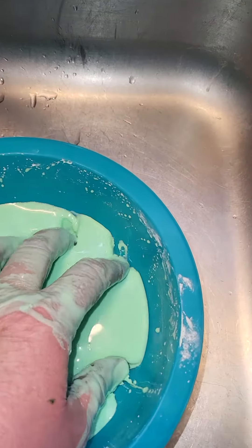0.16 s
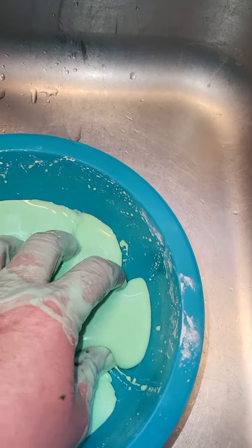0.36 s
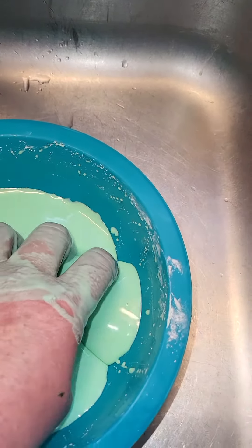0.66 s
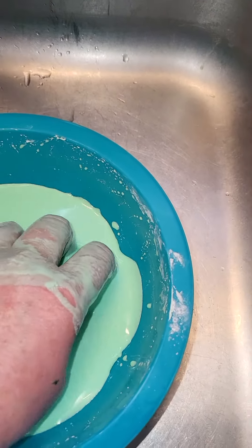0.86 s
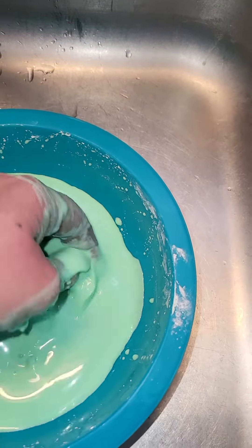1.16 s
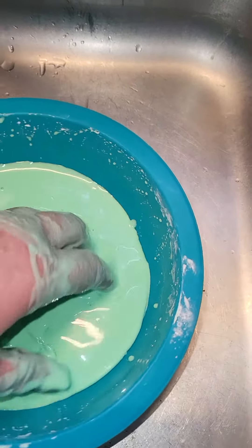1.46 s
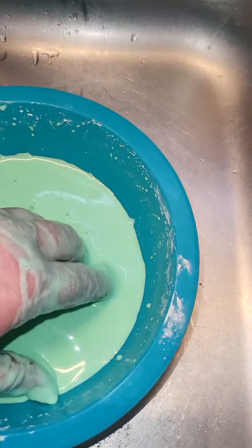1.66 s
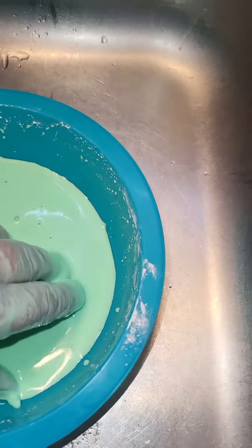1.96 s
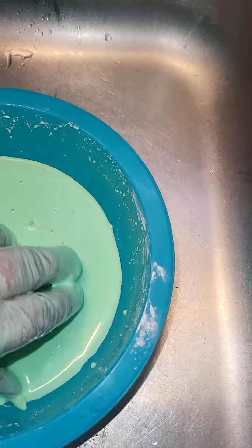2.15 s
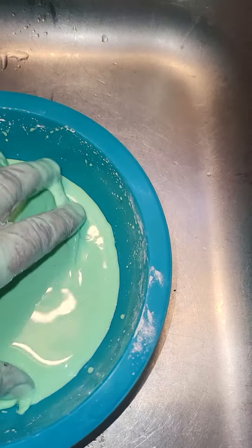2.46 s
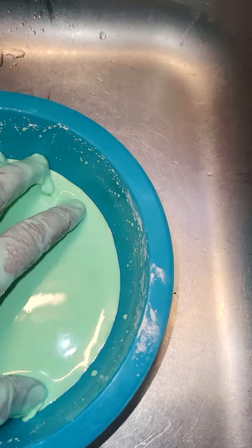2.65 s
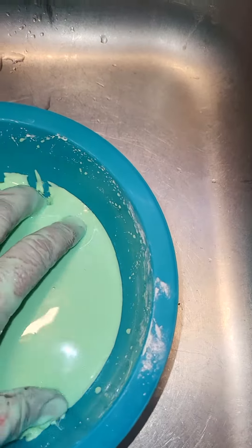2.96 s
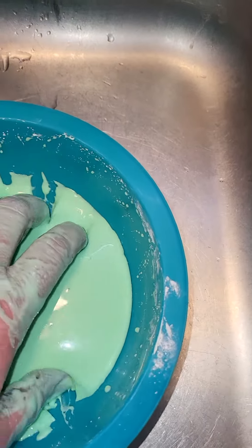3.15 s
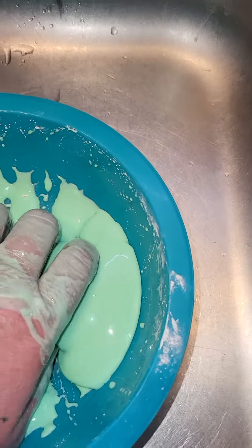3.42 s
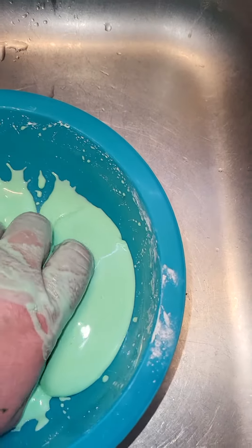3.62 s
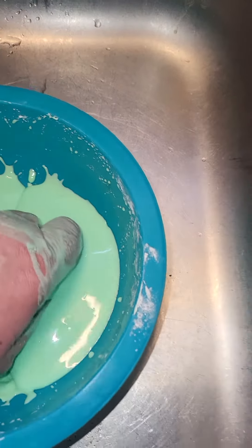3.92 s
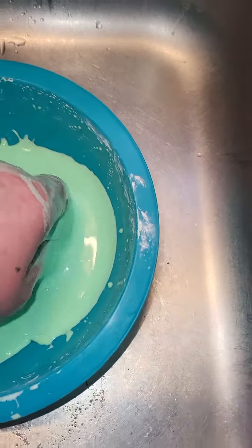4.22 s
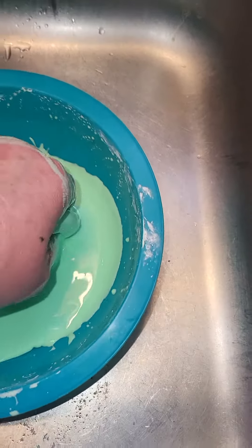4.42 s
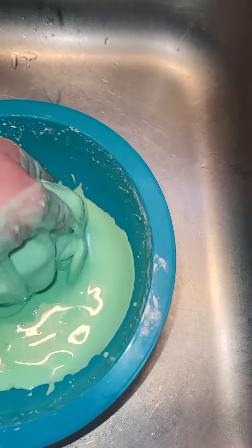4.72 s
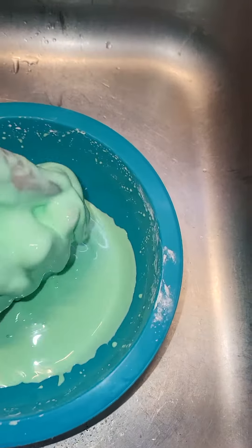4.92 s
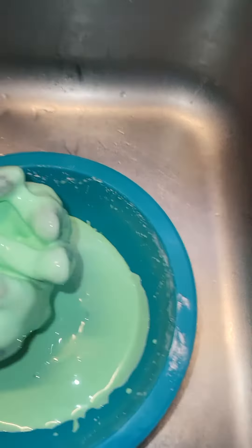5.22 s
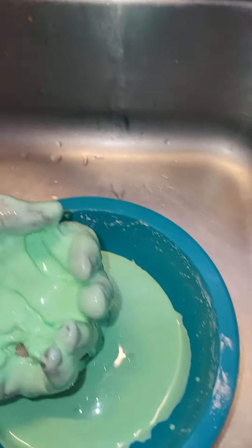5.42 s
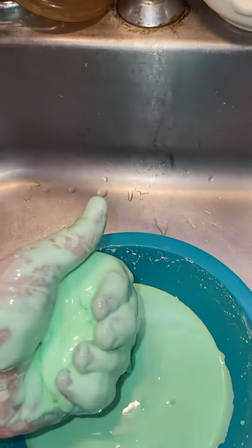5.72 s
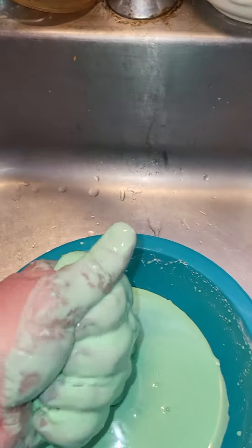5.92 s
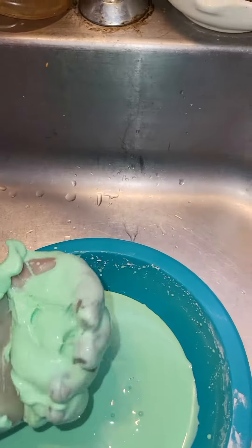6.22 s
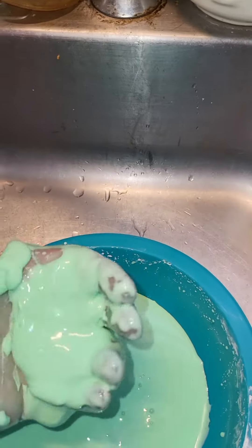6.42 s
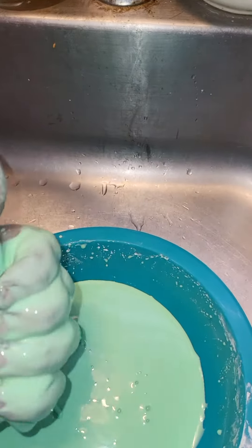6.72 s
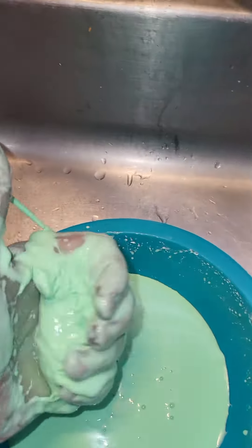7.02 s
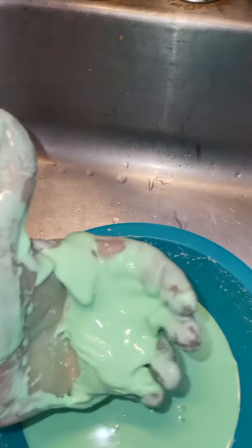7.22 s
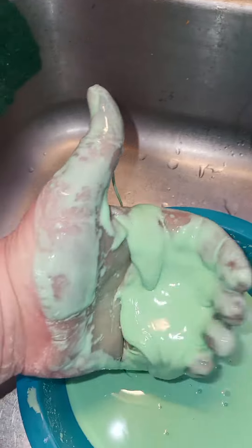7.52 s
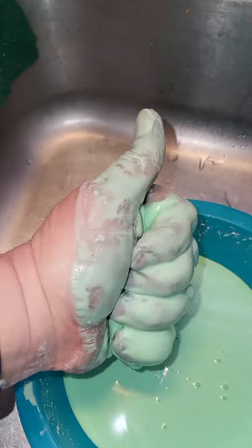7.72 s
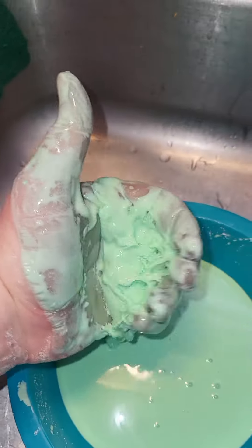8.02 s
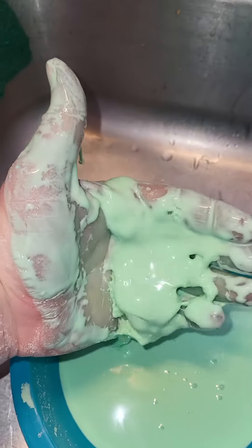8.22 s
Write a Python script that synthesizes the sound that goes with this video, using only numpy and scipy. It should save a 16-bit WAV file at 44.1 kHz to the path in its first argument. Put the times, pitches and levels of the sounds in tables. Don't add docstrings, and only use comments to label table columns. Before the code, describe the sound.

Very close dull thumps, creaks and wet scrapes of a bowl of slurry in a metal sink, a loud bouncing bang, then quiet squishing snaps.

```python
import sys
import numpy as np
from scipy import signal
from scipy.fft import rfft, irfft, next_fast_len
from scipy.io import wavfile
from scipy.ndimage import uniform_filter1d

SR = 44100
rng = np.random.default_rng(int(sys.argv[2]) if len(sys.argv) > 2 else 0)


def invert_db(level):
    return 10 ** (np.asarray(level, dtype=float) / 20)


def persist_wave(psi):
    counts = np.round(np.clip(psi, -1, 1) * 32767).astype(np.int16)
    wavfile.write(sys.argv[1], SR, np.atleast_2d(counts).T)


N = 369116

# (time [s], peak level [dB], upper wall modes [dB], rim [dB])
FOOT_KNOCKS = [
    (0.004, -25, -4, -4),
    (0.017, -36, 12, 7),
    (1.685, -27.5, -13, -27),
    (2.003, -30, -25, -16),
    (2.109, -38, -24, -17),
    (4.162, -25.5, -6.5, -13),
    (4.791, -17.5, -7.5, -20.5),
    (4.944, -22, -5.5, -20),
    (4.98, -17.5, -4, -10),
    (5.008, -25.5, -3, -14),
]
# (time [s], peak level [dB], upper wall modes [dB], rim [dB])
FLANK_KNOCKS = [
    (2.686, -42.5, -4, -12),
    (3.435, -29, -12, -24),
    (3.452, -34, -10, -28),
    (4.007, -38.5, -6, 2),
    (4.866, -8, -3, -10.5),
    (4.916, -18, -4, -41),
    (4.962, -22, -4, -28),
]
# (time [s], peak level [dB], upper wall modes [dB], rim [dB])
SHOULDER_KNOCKS = [
    (3.174, -33, -2, -14),
    (4.122, -12.5, -4, -14),
    (4.145, -20, -5, -30),
    (4.218, -16.5, -5, -16),
]
# (time [s], peak level [dB], upper wall modes [dB], rim [dB])
WALL_KNOCKS = [
    (3.158, -39, -1, -22),
    (3.19, -37, -1, -22),
    (3.209, -32, -1.5, -20),
    (3.228, -38, -1, -22),
    (4.8412, -6, -2, -8),
    (4.8426, -4, -1.5, -8),
    (4.886, -17, -3, -18),
    (4.892, -7, -3, -13),
]
# (time [s], peak level [dB], upper wall modes [dB], rim [dB])
CREAKS = [(0.156, -33, -1, -22), (0.167, -31, -5, -22), (0.191, -34, -20, -30), (0.202, -31, -2, -15),
          (0.24, -31, -4, -14), (0.268, -32, -2, -24), (0.278, -30, -4, -20), (0.343, -31, -3, -25),
          (0.356, -15, -1.5, -17), (0.381, -33, -8, -20), (0.399, -30, -3, -22), (0.445, -34, -6, -18),
          (0.463, -34, -5, -18)]
# (frequency [Hz], width [Hz], level [dB])
BOWL_MODES = [(222.8, 48, 4), (380, 25, 1.5), (490, 67, -2), (575, 50, 2), (680, 92, -2)]
# (frequency [Hz], width [Hz], level [dB])
WALL_MODES = [(930, 150, -1), (1085, 150, 0), (1300, 470, -4), (1500, 400, -4), (1930, 300, -10),
              (2300, 400, -10)]
# (frequency [Hz], width [Hz], level [dB])
RIM_MODES = [(2500, 150, 8.5), (2960, 630, 7), (4130, 500, 11), (5200, 1500, 7), (6300, 340, -12.5),
             (7600, 1600, -18.5)]
# (time [s], peak level [dB], pitch [Hz], upper modes [dB])
PRESSES = [(0.002, -30, 130, -3), (0.018, -28.5, 82, -12), (0.162, -38.5, 86, 5), (0.198, -42, 90, 6),
           (0.236, -40, 90, 5), (0.272, -36, 96, -2), (0.355, -35.5, 111, 3.5), (0.397, -36, 115, -10),
           (0.457, -37.5, 90, -1.5), (0.6, -34.5, 96, -13), (0.853, -35, 94, -7), (1.092, -31.5, 76, -7),
           (1.388, -32.5, 101, -9), (1.412, -26, 132, -11.5), (1.596, -32.5, 105, -26),
           (1.685, -19, 114, -2.5), (2.002, -21, 111, -12), (2.012, -21, 108, -20), (2.111, -22, 90, -18.5),
           (2.122, -22, 86.3, -22), (2.242, -34, 75, -14), (2.506, -32, 93, -20), (2.681, -29, 117, -17),
           (2.745, -38, 80, -15), (2.825, -38, 65, -15), (2.859, -40, 61, -8), (3.434, -31, 90, 3.5),
           (3.862, -36.5, 107, -5.5), (3.988, -28, 100.5, -8.5), (4.044, -26.5, 90, -26),
           (4.392, -34.5, 106, -8), (4.599, -33.5, 100, -22)]
# (time [s], peak level [dB], pitch [Hz], upper modes [dB])
BOUNCES = [(4.125, -15.5, 87.3, -26), (4.147, -21.5, 88, -19), (4.165, -18.5, 81, -7),
           (4.198, -20.5, 84, -9.5), (4.237, -12.5, 101, -24), (4.791, -23.5, 114, -16),
           (4.809, -16, 92, -8.5), (4.843, -7.5, 97, -6.5), (4.867, -7.5, 127.4, -13.5),
           (4.89, -7, 91.6, -16), (4.919, -13, 84, -20), (4.948, -21.5, 60.3, -16.5),
           (4.982, -18.5, 88.8, -19.5), (5.01, -23, 90.3, -14.5)]
# (time [s], peak level [dB], cavity centre [Hz], top octave [dB])
SNAPS = [(0.016, -38, 5240, 0), (1.055, -38.5, 7640, -5.5), (1.0854, -37, 3970, -6),
         (1.0954, -20, 5700, -13), (1.2464, -40.5, 7700, -16), (1.3758, -24.5, 10200, -8),
         (2.235, -43, 10000, -5), (2.7828, -39, 5350, -4), (2.891, -37.5, 5540, -13),
         (3.239, -35.5, 5990, -3.5), (3.829, -37, 5900, -6.5), (3.93, -26, 4970, -3),
         (4.0632, -38.5, 5440, -13), (4.8406, -16, 4500, -17), (4.8661, -23, 4110, -15.5),
         (4.8932, -16, 3940, -25), (5.9668, -40.5, 5400, -7.5), (6.121, -35, 8060, -4.5),
         (6.1509, -29, 7950, -4), (6.1545, -29, 7800, -11), (6.2975, -34, 6970, -5),
         (6.767, -20, 6420, -28), (6.9711, -39.5, 8700, -3), (7.004, -40, 6300, 0),
         (7.078, -25.5, 7000, -10), (7.2258, -43, 11030, -7), (7.6161, -46, 6300, -14),
         (7.7882, -43, 6090, -14.5), (7.94, -31, 7020, -26), (7.9757, -35.5, 5650, -9)]
# (time [s], peak level [dB])
TICKS = [(1.0021, -44), (1.152, -43), (1.6402, -45), (2.4516, -50.5), (3.3495, -41), (3.43, -45),
         (3.778, -46), (3.8563, -41.5), (4.189, -42.5), (4.421, -43.5), (5.198, -54), (5.29, -50),
         (5.3209, -43.5), (6.0602, -48.5), (6.0883, -45.5), (6.1454, -46), (6.157, -33), (6.1847, -50),
         (6.2172, -40), (6.2908, -52), (6.9582, -49), (7.0623, -39.5), (7.1172, -47), (7.1462, -45),
         (7.1675, -37.5), (7.9668, -37), (8.01, -50), (8.0456, -50.5), (8.07, -43.5), (8.172, -47)]
# (time [s], peak level [dB])
SPECKS = [(1.1837, -44), (1.3463, -50), (2.4009, -51), (2.5714, -58), (2.8145, -45), (5.2784, -55),
          (5.309, -55), (6.0944, -51), (6.2934, -45), (7.1024, -47), (7.1906, -47), (7.9548, -46),
          (7.9994, -46), (8.0194, -45), (8.0264, -48), (8.0764, -46)]
# (start [s], hold [s], scrape level [dB], fine fizz level [dB])
STROKES = [(-0.03, .01, -44, -58), (.1, 0.34, -53.5, -65), (.435, 0.0071, -45.5, -60),
           (.55, 0.029, -47, -57.5), (.68, 0.083, -49, -61.5), (.81, 0.073, -46, -57.5),
           (.97, 0.13, -58, -62), (1.15, 0.29, -66.5, -79), (1.365, 0.042, -47, -61),
           (1.49, 0.0056, -47.5, -55), (1.56, 0.034, -60.5, -61), (1.7, 0.4, -71, -77),
           (2.49, .08, -68, -82), (2.63, .02, -62, -74), (2.66, .03, -48.5, -65), (2.76, 0.25, -55, -61.5),
           (3.0, .5, -50, -57.5), (3.56, 0.084, -52.5, -61), (3.7, 0.12, -58.5, -66),
           (3.85, .08, -49.5, -60.5), (4.0, .3, -61.5, -70), (4.65, 0.015, -67, -83.5),
           (5.4, .07, -70, -88), (4.83, .06, -46, -62), (6.04, .08, -67, -65), (6.13, 0.018, -61.5, -55),
           (6.69, .06, -72, -72), (6.79, .1, -63.5, -73), (6.95, .15, -65.5, -60),
           (7.89, .15, -67.5, -59.5)]
# (frequency [Hz], density [dB per Hz])
SCRAPE_COLOUR = [(410, -33), (700, 2), (768, -9), (978, -3.5), (1180, -8.5), (1410, -2), (1820, -6),
                 (2550, -1.5), (3130, -5.5), (5570, -2), (11000, -22), (14300, -49), (22000, -120)]
# (frequency [Hz], density [dB per Hz])
FIZZ_COLOUR = [(5290, -41.5), (9000, -20), (10900, -1.5), (12400, 4.5), (15100, 2), (16000, 5.5),
               (16800, -29.5)]
OOZE_S = [
    1.0,
    2.03,
    3.47,
    3.9,
    5.45,
    6.9,
    7.09,
    8.05,
]
# (level [dB], cavity centre [Hz], length [s])
OOZE = [(-55, 580, 0.31), (-62.5, 2060, 0.1), (-54, 700, 0.06), (-54, 850, 0.14), (-75, 2700, 0.08),
        (-58, 680, 0.13), (-61, 2200, 0.043), (-66, 1700, 0.11)]
# (time [s], sink rumble level [dB])
LOAD = [(0, -46), (1.6, -48.5), (1.9, -58.5), (2.6, -61), (2.72, -52), (2.95, -54), (3.3, -49), (3.8, -51),
        (4.2, -42), (4.7, -58), (5.0, -46), (5.3, -59.5), (5.7, -64.5), (8.37, -64.5)]
# (frequency [Hz], width [Hz], level [dB])
SINK_MODES = [(79, 43, -3), (100, 20, -3), (132, 22, -7)]
# (frequency [Hz], density [dB per Hz])
KITCHEN_COLOUR = [(15, -51), (25, -22), (43, 1.5), (143, -8), (188, 1), (282, -9.5), (315, -15), (657, -21),
                  (817, -51.5), (2780, -47), (3100, -45), (8980, -42.5), (10900, -61), (15100, -37),
                  (16800, -45)]
# (frequency [Hz], width [Hz], level [dB])
DRONES = [(120, 4.9, -11.5), (178.5, 6.8, -11.5), (241, 8.6, -14.5), (364.2, 29, -19), (484, 19, -14),
          (604, 16, -25.5), (2600, 250, -30.5), (7800, 67, -31), (15200, 260, -23.5)]
# (frequency [Hz], left minus right [dB])
PORTS = [(60, 0.5), (110, 0.5), (200, 0.5), (380, -3.5), (700, -1.0), (1290, 7.5), (2380, -1.0),
         (4400, -3.0), (8120, 0.0), (15000, -7.5)]

FOOT_HZ, FLANK_HZ, SHOULDER_HZ = (350, 1300), (633, 1295), (420, 995)
WALL_HZ, CREAK_HZ = (295, 1292), (290, 1480)
CREAK_BOWL_DB = -10
PUSH_S, PUSH_WIDTH_S, ROUGH = .0012, .00011, .2
BLOW_SCATTER_DB, PORT_SCATTER_DB, BLOW_DETUNE = 2.5, 2, .025
SWELL_S, PRESS_T60_S, BOUNCE_T60_S = 0.0051, .09, 0.089
SOFTER_S_PER_DB = -0.0046
TICK_HZ, TICK_TOP_DB = 5900, -3
STROKE_ATTACK_S, STROKE_T60_S = 0.029, 0.3
DRIP_T60_S, DRIP_DB = 1.1, -17
REST_SCRAPE_DB, REST_FIZZ_DB = -77.5, -84.5
BASIN_T60_S, BASIN_DB, BASIN_GAP_S, BASIN_HZ = 0.13, -8, 0.003, 448.6
FILM_WET_DB = -2
AIR_DB, AIR_PER_LOAD = -38, .26
THROB_HZ, THROB_DEPTH, WHINE_WANDER_DB = 60, .7, 3
DUCK_S, DUCK_LENGTH_S, DUCK_DB = 5.6, 0.54, -5.5
DIP_HZ, DIP_WIDTH_HZ, DIP_DB = 10000, 710, -7
ALIKE_HZ = 540
TURN_RAD, TURN_HZ = 1.5, 350
TOP_HZ, STEADY_TOP_HZ = 16300, 15900


def unit_rms(x):
    return x / np.sqrt(np.mean(x ** 2))


def read_curve(table, hz):
    f, v = np.transpose(table)
    return np.interp(np.log(hz + 1), np.log(f + 1), v, left=v[0], right=v[-1])


def shape(x, gain):
    size = next_fast_len(x.shape[-1])
    hz = np.arange(size // 2 + 1) * SR / size
    return irfft(rfft(x, size) * gain(hz), size)[..., :x.shape[-1]]


def ring(x, modes):
    return sum((-1) ** k * invert_db(db) * signal.lfilter(*signal.iirpeak(hz, hz / width, fs=SR), x)
               for k, (hz, width, db) in enumerate(modes))


def fade(t, t60):
    return np.exp(-np.log(1000) * t / max(t60, .003))


def without(db, part_db, ceiling_db):
    return db + 10 * np.log10(1 - invert_db(2 * min(part_db, ceiling_db)))


def add(out, s, grain, db, pan_db):
    i = max(int(s * SR), 0)
    grain = (grain * invert_db(db) / np.abs(grain).max())[..., :N - i]
    out[:, i:i + grain.shape[-1]] += invert_db(np.array([[pan_db], [-pan_db]]) / 2) * grain


def walk(rate):
    k = int(SR / rate)
    steps = np.repeat(rng.standard_normal(N // k + 1), k)
    return 0.69 * uniform_filter1d(uniform_filter1d(steps, k), k)[:N]


def wide():
    mid, side = rng.standard_normal((2, N))
    alike = lambda hz: 1 / (1 + (hz / ALIKE_HZ) ** 3)
    mid = shape(mid, lambda hz: np.sqrt(1 + alike(hz)))
    side = shape(side, lambda hz: np.sqrt(1 - alike(hz)))
    return mid + np.outer([1, -1], side)


def vary(modes):
    varied = []
    for hz, width, db in modes:
        pitch, strength, port = rng.standard_normal(3)
        port_db = PORT_SCATTER_DB * port * np.array([[1], [-1]])
        varied.append((hz * (1 + BLOW_DETUNE * pitch), width, db + BLOW_SCATTER_DB * strength + port_db))
    return varied


def knock(out, s, db, wall_db, rim_db, floor_hz, wall_hz, others):
    t = np.arange(SR // 8) / SR
    push = lambda widen: -np.exp(-((t - PUSH_S) / (widen * PUSH_WIDTH_S)) ** 2)
    grit_decay = fade(t, 0.008 + 0.013 * invert_db(db / 2)) + 0.07 * fade(t, .08)
    grit = rng.standard_normal((2, len(t))) * grit_decay * (1 - np.exp(-t / .0012))
    grit = ROUGH * (grit[0] + 1.2 * grit)

    floor = ring(push(1.6) + grit, [(floor_hz, .2 * floor_hz, 3.0)])
    floor = floor + others * ring(push(1.6) + 1.5 * grit, vary(BOWL_MODES + [(800, 250, -12)]))
    wall = ring(push(1) + grit, [(wall_hz, 110, 4.0)]) + ring(push(1) + 1.4 * grit, vary(WALL_MODES))
    rim = ring(push(.35) + 2.5 * grit, vary(RIM_MODES))
    add(out, s, floor, without(db, wall_db, -.6), 0)
    add(out, s, ring(wall, [(1350, 2000, 0)]), db + wall_db, -2.5)
    add(out, s, rim, db + rim_db + 2.5, -1.8)


def knocks():
    out = np.zeros((2, N))
    places = ((FOOT_HZ, FOOT_KNOCKS, 0), (FLANK_HZ, FLANK_KNOCKS, 0), (SHOULDER_HZ, SHOULDER_KNOCKS, 0),
              (WALL_HZ, WALL_KNOCKS, 0), (CREAK_HZ, CREAKS, CREAK_BOWL_DB))
    for (floor_hz, wall_hz), rows, others_db in places:
        for s, db, wall_db, rim_db in rows:
            knock(out, s, db, wall_db, rim_db, floor_hz, wall_hz, invert_db(others_db))
    return out


def thumps():
    out, t = np.zeros((2, N)), np.arange(SR // 3) / SR
    upper = np.sin(2 * np.pi * 188 * t) + .7 * np.sin(2 * np.pi * 265 * t) + 0.18 * np.sin(2 * np.pi * 345 * t)
    for rows, ring_s, softer in ((PRESSES, PRESS_T60_S, SOFTER_S_PER_DB), (BOUNCES, BOUNCE_T60_S, 0)):
        for s, db, hz, upper_db in rows:
            t60 = ring_s + softer * max(-20 - db, 0)
            phase = 2 * np.pi * hz * (t - 0.47 * t ** 2)
            add(out, s, -np.sin(phase) * fade(t, t60) * (1 - np.exp(-t / SWELL_S)), db, 0)
            upper_swell = fade(t, 1.4 * t60) * (1 - np.exp(-3 * t / SWELL_S))
            add(out, s, -upper * upper_swell, db + upper_db + 2.5, 0)
    return out


def snaps():
    out, t = np.zeros((2, N)), np.arange(SR // 10) / SR
    click = np.exp(-((t - .0007) / .00002) ** 2)
    films = [(*row, .22) for row in SNAPS]
    threads = [(s, db, TICK_HZ, TICK_TOP_DB, .1) for s, db in TICKS]
    specks = [(s, db, TICK_HZ, -.4, .08) for s, db in SPECKS]
    for s, db, hz, top_db, tear in films + threads + specks:
        fray = (fade(t, 0.0065) + tear * fade(t, .04)) * (1 - np.exp(-t / 0.0009))
        burst = rng.standard_normal((2, len(t))) * fray + 1.2 * click
        cavity = ring(ring(burst[0], [(hz, 0.63 * hz, 0)]), [(hz, 1.4 * hz, 0)])
        body = ring(burst[0], [(2200, 2800, -15.5)])
        top = ring(ring(burst[1], [(14700, 4000, 0)]), [(14900, 4500, 0)])
        add(out, s, cavity + body, without(db, top_db, -.3) + 2.5, -2.5)
        add(out, s, top, db + min(top_db, 0) + 8.5, -2.5)
    return out


def strokes():
    t = np.arange(N) / SR
    power = invert_db(2 * np.array([[REST_SCRAPE_DB], [REST_FIZZ_DB]]))
    for s, hold, scrape_db, fizz_db in STROKES:
        after = np.maximum(t - s - STROKE_ATTACK_S - hold, 0)
        swell = np.clip((t - s) / STROKE_ATTACK_S, 0, 1) ** 2
        stop = fade(after, STROKE_T60_S) + invert_db(DRIP_DB) * fade(after, DRIP_T60_S)
        power = power + (invert_db(np.array([[scrape_db], [fizz_db]])) * swell * stop) ** 2
    return 10 * np.log10(power)


def rubbing(colour, db, rate, spread_db, grain, flicker_db, bands_hz):
    slips = (rng.random(N) < rate / SR) * invert_db(spread_db * rng.exponential(size=N))
    slips = unit_rms(signal.lfilter([1], [1, -.98], slips))
    rush = wide() * (2.0 + grain * slips)
    rush = unit_rms(shape(rush, lambda hz: invert_db(read_curve(colour, hz))))
    out = np.zeros((2, N))
    for hat in np.eye(len(bands_hz)):
        part = shape(rush, lambda hz: read_curve(list(zip(bands_hz, hat)), hz))
        out += part * invert_db(flicker_db * (walk(8.2) + walk(30)))
    return out * invert_db(db)


def ooze():
    t, out = np.arange(N) / SR, np.zeros((2, N))
    for s, (db, hz, length) in zip(OOZE_S, OOZE):
        wet = ring(ring(wide(), [(hz, .35 * hz, 0)]), [(hz, .7 * hz, 0)])
        out += invert_db(db) * unit_rms(wet) * np.exp(-(2 * (t - s) / length) ** 2)
    return out


def rumble(db):
    return unit_rms(ring(rng.standard_normal(N) * invert_db(4.8 * walk(28)), SINK_MODES)) * invert_db(db)


def basin(x, wet_db):
    t = np.arange(SR // 2) / SR
    decay = fade(t, BASIN_T60_S) + 0.058 * fade(t, .45)
    tail = rng.standard_normal((2, len(t))) * decay * (t > BASIN_GAP_S)
    tail = invert_db(wet_db) * tail / np.sqrt(np.sum(tail ** 2, axis=1, keepdims=True))
    wet = signal.fftconvolve(x, tail, axes=1)[:, :N]
    return x + shape(wet, lambda hz: (hz < STEADY_TOP_HZ) * hz ** 2 / (hz ** 2 + BASIN_HZ ** 2))


def kitchen(db):
    air = unit_rms(shape(wide(), lambda hz: invert_db(read_curve(KITCHEN_COLOUR, hz))))
    *drones, whine = (invert_db(d) * unit_rms(ring(wide(), [(hz, width, 0)])) for hz, width, d in DRONES)
    throb = 1 + THROB_DEPTH * np.sin(2 * np.pi * THROB_HZ * np.arange(N) / SR)
    whine = whine * throb * invert_db(WHINE_WANDER_DB * walk(2))
    return (air + sum(drones) + whine) * invert_db(db + 1.5)


def scene():
    t = np.arange(N) / SR
    blows = basin(knocks(), BASIN_DB) + basin(snaps(), BASIN_DB + FILM_WET_DB)
    blows = shape(blows, lambda hz: invert_db(DIP_DB * np.exp(-((hz - DIP_HZ) / DIP_WIDTH_HZ) ** 2)))

    scrape_db, fizz_db = strokes()
    scrape = rubbing(SCRAPE_COLOUR, scrape_db, rate=300, spread_db=1.8, grain=.5, flicker_db=2.5,
                     bands_hz=[900, 1500, 2400, 3600, 5500, 8500])
    fizz = rubbing(FIZZ_COLOUR, fizz_db, rate=120, spread_db=3.4, grain=.9, flicker_db=1.5,
                   bands_hz=[12000, 15500])

    rumble_db = np.interp(t, *np.transpose(LOAD))
    duck_db = DUCK_DB * np.exp(-((t - DUCK_S) / DUCK_LENGTH_S) ** 2)
    air = kitchen(AIR_DB + AIR_PER_LOAD * rumble_db + duck_db)
    steady = shape(scrape + fizz + air, lambda hz: hz < STEADY_TOP_HZ)
    return thumps() + blows + ooze() + rumble(rumble_db - 2.5) + steady


def low_pass(x):
    return signal.sosfilt(signal.butter(12, 17030, fs=SR, output="sos"), x)


def record(dry):
    turn = lambda hz: np.exp(-.5j * TURN_RAD * hz ** 2 / (hz ** 2 + TURN_HZ ** 2))
    left = shape(dry[0], lambda hz: invert_db(read_curve(PORTS, hz) / 2) * turn(hz))
    right = shape(dry[1], lambda hz: invert_db(-read_curve(PORTS, hz) / 2) / turn(hz))
    x = np.array([left, right])
    x = signal.sosfilt(signal.butter(6, 46, "high", fs=SR, output="sos"), x)
    x = signal.sosfilt(signal.ellip(8, .2, 70, TOP_HZ, fs=SR, output="sos"), x)
    mix = np.clip(x, -.99, .99)
    return low_pass(mix)


dry = scene()
out = record(dry)
persist_wave(out)
```